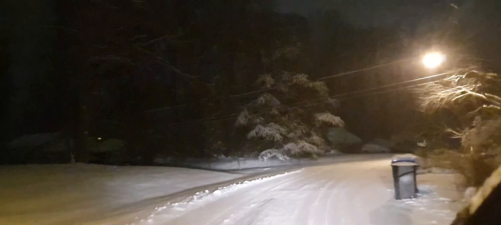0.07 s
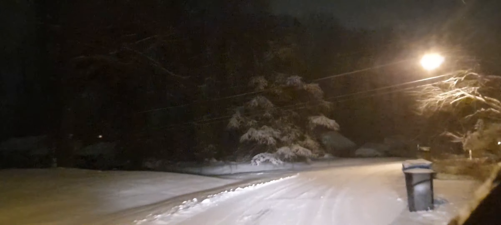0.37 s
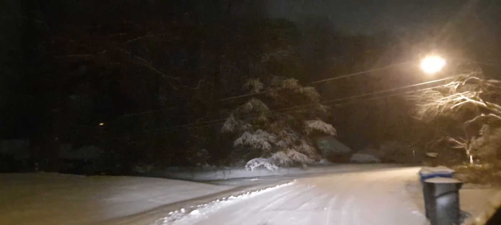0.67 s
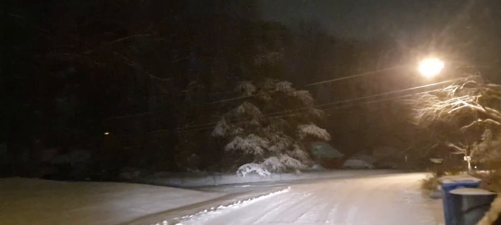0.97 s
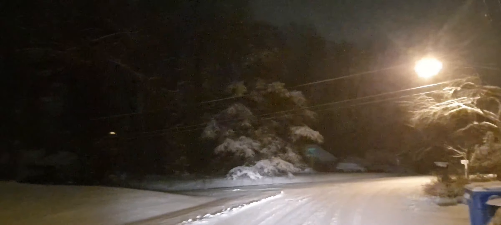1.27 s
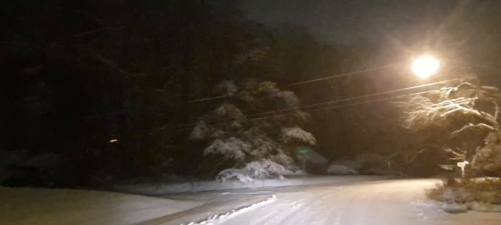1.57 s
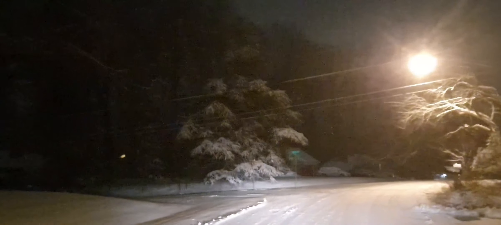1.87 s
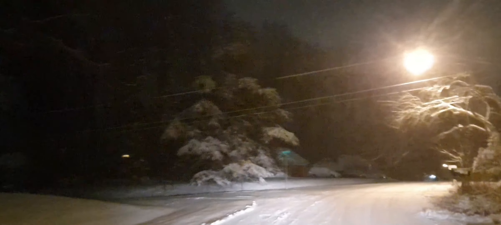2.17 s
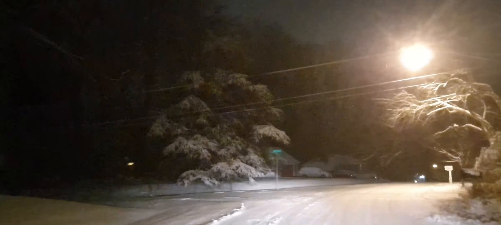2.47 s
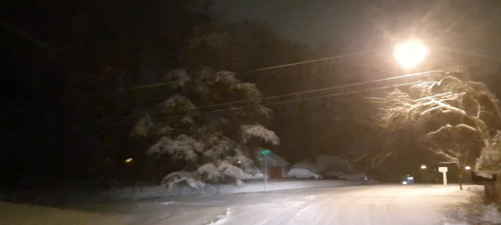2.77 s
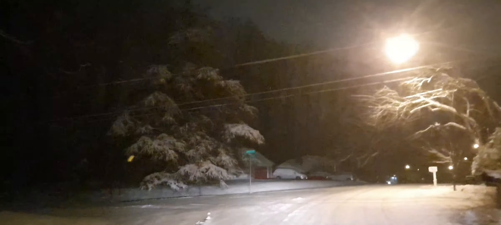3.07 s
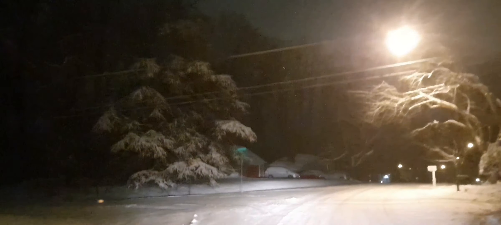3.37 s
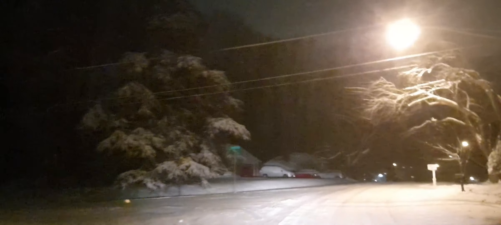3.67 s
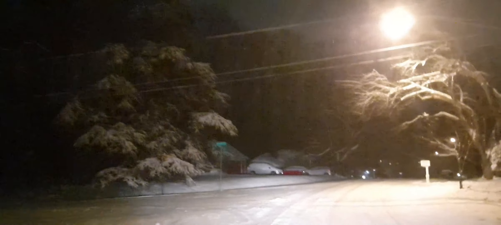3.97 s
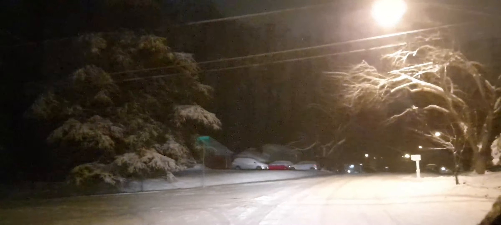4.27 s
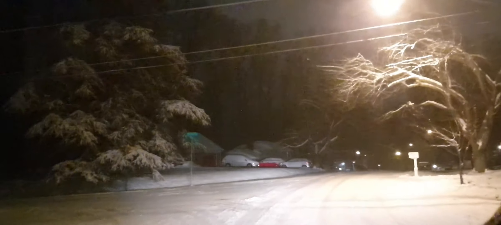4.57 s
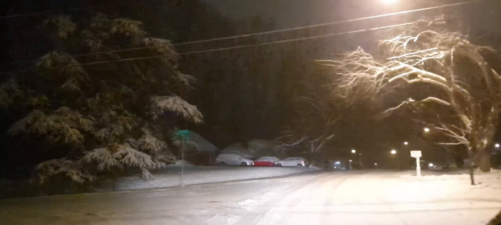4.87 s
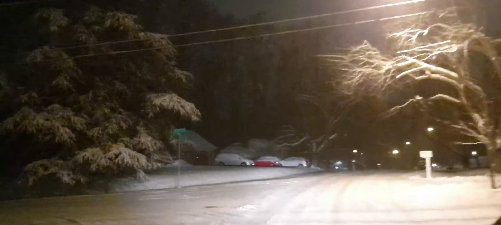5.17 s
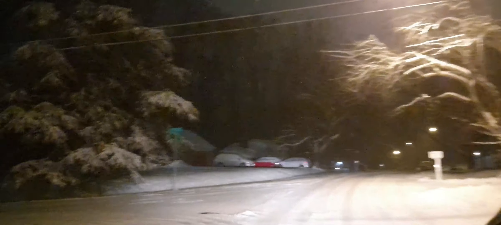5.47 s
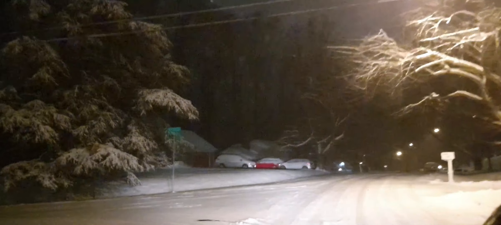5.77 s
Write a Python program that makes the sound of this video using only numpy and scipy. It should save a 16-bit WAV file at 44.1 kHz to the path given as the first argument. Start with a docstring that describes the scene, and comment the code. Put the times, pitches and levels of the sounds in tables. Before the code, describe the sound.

Heard from the cabin, a low engine hum and an uneven rumble accompany a car rolling slowly along a snowy street. Snow crunches and crackles under the tyres throughout, with brittle cracks toward the right and dull bumps toward the left. Tiny squeaks and a soft hiss sit behind the crunching. The engine soon drops back, and the rumble eases near the end.

```python
"""Packed snow fractures under the tyres of a car creeping along a street at night, heard from inside. Each
break is an impulse that excites a resonance: slabs crunch, brittle crust cracks, and grains merge into a dense
crackle. Grains that slip instead squeak and creak, and loose snow hisses. Beneath the snow, ruts thud through
the rumbling body and the engine hums, easing off and then pulling again."""
import sys
import numpy as np
from scipy import signal
from scipy.fft import rfft, irfft
from scipy.io import wavfile

SR = 44100
rng = np.random.default_rng(int(sys.argv[2]) if len(sys.argv) > 2 else 0)


def unload_wav(signal):
    """Save mono or channel-first audio to the path in sys.argv[1] as 16-bit WAV at rate SR, clipped to [-1, 1]."""
    wavfile.write(
        sys.argv[1],
        SR,
        np.round(np.clip(np.atleast_2d(signal).T, -1, 1) * 32767).astype(np.int16),
    )


N = 265658
TIME = np.arange(N) / SR
CRUNCH_NOTE_HZ = 394

# Levels in the tables are relative; each source adds its own trim.
# Body rumble. Each row: time in seconds, level in dB.
RUMBLE_LEVELS = [(0, -39.5), (1.2, -37), (2.0, -36), (2.4, -39.5), (2.85, -35.5), (3.25, -41), (3.65, -41),
                 (3.95, -33), (4.65, -39.5), (5.05, -38.5), (5.45, -41), (5.68, -50), (6.02, -41.5)]
# Engine running. Each row: time in seconds, firing rate in Hz, level in dB, throttle from 0 to 1.
ENGINE_STATES = [(0, 32.15, -39, 0.8), (.5, 31.07, -36.5, 0.88), (1.3, 30.33, -38, 0.98),
                 (1.6, 29.26, -44.5, .1), (2.1, 28.66, -45, 0.1), (2.7, 30.5, -49, 0.1),
                 (3.4, 30.15, -57, 0.6), (5.2, 31.6, -68, 0), (6, 32.2, -51, 0.9)]
# Engine hum. Each row: multiple of the firing rate, level at idle in dB, level at full throttle in dB.
ENGINE_HARMONICS = [(2, -7, -16), (3, 1, -7), (4, -8.5, -2.5)]
# Ruts and lumps. Each row: time near the middle in seconds, length in seconds, left and right level in dB.
RUT_JOLTS = [(.104, 0.027, -28, -42), (.217, .026, -29.5, -52), (.318, 0.027, -37, -37),
             (0.409, 0.025, -33, -44), (0.475, 0.023, -39, -61), (.899, 0.025, -30.5, -58),
             (1.184, .035, -27, -49), (1.25, 0.038, -26.5, -63), (1.359, 0.024, -37, -68),
             (1.504, .026, -25.5, -46), (1.779, .026, -34, -59), (1.908, 0.025, -33, -53),
             (1.979, .05, -36, -50), (2.261, .022, -25, -34), (2.618, 0.027, -29.5, -66),
             (2.707, .026, -29.5, -61), (2.972, 0.024, -31.5, -63), (3.04, 0.035, -32.5, -62),
             (3.366, .08, -33, -56), (3.877, 0.033, -26, -47), (3.95, 0.062, -28.5, -64),
             (4.045, 0.028, -30, -68), (4.248, .026, -36, -62), (4.354, 0.031, -28.5, -51),
             (4.503, .026, -24, -58), (4.91, 0.036, -32, -62), (5.43, .04, -31, -63)]
# Loose snow. Each row: time in seconds, level in dB, fine powder over coarse spray in dB.
SPRAY_LEVELS = [(0, -54.5, -0.1), (1.4, -55, -1), (2.4, -55.5, -0.6), (3.0, -57, -0.5), (3.4, -56.5, 1.5),
                (3.85, -55.5, 2), (4.35, -57, 0), (4.7, -56, .5), (5.05, -54.5, 0.8), (5.5, -57, -1.5),
                (6.02, -57.5, -0.5)]
# Swells of the hiss. Each row: middle in seconds, width in seconds, rise in dB.
SPRAY_SWISHES = [(1.72, 0.12, 2.5), (3.36, 0.18, 3), (3.957, 0.16, 2.5), (4.761, 0.16, 3.5)]
# Cold grains rubbing. Each row: middle in seconds, half-height width in seconds, pitch in Hz, level in dB.
GRAIN_SQUEAKS = [(0.151, 0.02, 2620, -48), (0.42, 0.018, 2650, -46), (1.525, 0.018, 3400, -57),
                 (1.691, 0.075, 4330, -60), (2.307, .03, 3800, -54), (3.184, .03, 4000, -59),
                 (3.317, 0.067, 3960, -56), (3.38, 0.027, 2600, -53), (3.821, 0.018, 2760, -50.5),
                 (3.954, 0.018, 2950, -50.5), (4.552, 0.034, 3500, -58), (5.135, 0.026, 3500, -56),
                 (5.756, 0.036, 1250, -46.5)]
# Crackle, following the firmness of the snow. Each row: time in seconds, level in dB.
CRACKLE_LEVELS = [(0, -44), (1.0, -44), (1.25, -43), (1.7, -42.5), (2.2, -43.5), (2.8, -42.5), (2.95, -45),
                  (3.55, -45), (3.95, -41.5), (4.35, -46.5), (5.05, -45.5), (5.3, -47), (5.6, -44.5),
                  (6.02, -48.5)]
# Crust snapping at the near, right wheel. Each row: start in seconds, level in dB.
CRUST_SNAPS = [(0.154, -36.5), (0.559, -38), (.894, -33), (1.182, -35), (1.199, -33), (1.33, -40),
               (1.39, -37.5), (1.424, -33), (1.474, -48), (1.512, -37), (1.528, -29.5), (1.611, -35),
               (1.671, -34.5), (1.871, -35.5), (2.277, -34), (2.294, -31), (2.31, -29), (2.389, -38.5),
               (2.462, -39), (2.563, -33), (2.584, -36), (2.647, -34.5), (2.66, -35), (2.805, -34),
               (2.842, -37), (3.625, -33.5), (3.796, -34), (3.961, -35), (3.999, -48), (4.164, -38),
               (4.545, -32.5), (5.105, -37), (5.305, -37.5), (5.738, -29), (5.748, -33), (5.768, -29.5),
               (5.974, -43)]
# Slabs collapsing. Each row: start in seconds, nominal length in seconds, left and right level in dB.
SLAB_COLLAPSES = [(0.092, 0.018, -30.5, -35.5), (0.159, 0.02, -36.5, -40), (.202, .013, -33.5, -37),
                  (0.41, 0.013, -33.5, -44), (0.467, .013, -34.5, -36), (0.554, 0.01, -35, -39.5),
                  (0.742, 0.031, -37, -40.5), (.87, 0.0072, -37, -35.5), (0.911, .014, -47, -41),
                  (0.984, 0.023, -41.5, -48), (1.082, 0.014, -32.5, -32.5), (1.167, 0.023, -30, -34.5),
                  (1.232, 0.025, -34.5, -35.5), (1.323, .017, -58, -38), (1.382, .028, -49, -38.5),
                  (1.467, 0.012, -32, -41), (1.498, 0.014, -35, -30.5), (1.761, .02, -35.5, -35.5),
                  (1.815, 0.014, -29.5, -31), (1.866, 0.012, -30, -34), (1.894, .013, -27.5, -44),
                  (1.926, .012, -35, -36.5), (2.046, 0.0094, -31, -54), (2.129, .028, -45, -39.5),
                  (2.253, 0.015, -34.5, -32.5), (2.3, 0.012, -41, -38.5), (2.513, 0.018, -33.5, -32),
                  (2.641, 0.017, -37.5, -32), (2.701, .023, -33.5, -33.5), (2.778, 0.02, -29, -31),
                  (2.855, 0.01, -50, -37), (2.956, 0.0093, -37, -43), (3.02, .014, -28.5, -32.5),
                  (3.074, .02, -46, -40), (3.179, 0.02, -40, -42.5), (3.58, 0.018, -34.5, -39),
                  (3.616, .013, -36, -34), (3.651, 0.0078, -31.5, -43), (3.713, 0.025, -43, -40),
                  (3.762, .014, -36.5, -34), (3.795, .022, -40, -37.5), (3.858, 0.025, -30, -33.5),
                  (3.89, 0.025, -32, -33), (3.93, 0.031, -44, -36), (4.119, 0.014, -44, -37),
                  (4.24, .019, -33.5, -32.5), (4.344, 0.016, -37.5, -38), (4.501, 0.019, -37.5, -40),
                  (4.565, 0.015, -35.5, -44), (4.814, 0.012, -33.5, -44), (4.885, 0.025, -42, -38),
                  (4.927, 0.014, -38.5, -36.5), (5.003, 0.018, -31.5, -35), (5.081, 0.013, -36.5, -36.5),
                  (5.163, .012, -40.5, -39.5), (5.345, .022, -37, -46), (5.433, 0.029, -43, -40),
                  (5.628, 0.016, -51, -43), (5.708, .017, -43, -54), (5.745, .027, -44, -39.5),
                  (5.784, 0.023, -44, -42.5), (5.905, 0.011, -37, -42)]
# Frequency responses, one to a source. Each row: frequency in Hz, left and right gain in dB.
RUMBLE_SPECTRUM = [(15, -27.5, -29), (38, -14, -44), (60, -2, -41), (85, 4, -55), (126, -2.5, -28),
                   (170, -9.5, -29), (257, -16, -59), (477, -30, -32), (940, -30, -60), (2000, -79, -79)]
THUD_SPECTRUM = [(12, -15, -7), (33, -18, -1), (54.7, -3.5, -1), (80.5, 4.5, 1), (117, -2.5, 15),
                 (187, -11.5, 6), (300, -21.5, -27), (770, -43, -57), (2500, -71, -91)]
HISS_SPECTRUM = [(400, -12, -48), (1480, -4.5, 8), (3070, -3, -3), (4640, 0, 0.5), (5500, -2, -2.5),
                 (7600, -2, -3), (9140, -4, -7), (10100, -9, -7.5), (11900, -6, -6.5), (15500, -10, -11.5)]
CRACKLE_SPECTRUM = [(97, -12.5, -28.5), (249, -20.5, -18), (312.4, -1.5, 0), (484, -16.5, -2),
                    (700, -13, -10), (962, -14.5, -12), (1136, -3, -4), (1500, -5.5, -12),
                    (2300, -18.5, -24), (3230, -23.5, -29), (8300, -57.5, -45)]
CRACK_SPECTRUM = [(150, -36, -17), (400, -29, -4), (970, -2, -3), (1195, 2, 3.5), (1640, -5, -4.5),
                  (2240, -7, -9.5), (3860, -18, -25.5), (12000, -35, -40)]
CRUNCH_SPECTRUM = [(50, -16, -21), (140, 1, -22.5), (264, 1.5, -6.5), (333, 0.5, 2.5), (510, -5, -1.5),
                   (638, -10, -5), (970, -18, -10), (1220, -21, -6), (2150, -37, -31), (4000, -42, -37),
                   (12000, -60, -68)]


def gain_of(db):
    """Amplitude grows tenfold for every 20 dB."""
    return 10 ** (np.asarray(db) / 20)


def unit_rms(x):
    """Normalisation to a mean power of one."""
    return x / np.sqrt(np.mean(x ** 2) + 1e-20)


def curves(table):
    """Linear interpolation of each column over time."""
    s, *columns = np.transpose(table)
    return [np.interp(TIME, s, column) for column in columns]


def swell(s, width):
    """A Gaussian envelope of height one, centred on time s."""
    return np.exp(-(2 * (TIME - s) / width) ** 2)


def add(mix, s, sound):
    """Superposition: a stereo sound joins the mix at time s."""
    part = mix[:, max(0, round(s * SR)):][:, :sound.shape[1]]
    part += sound[:, :part.shape[1]]


def wander(rate_hz):
    """Low-passed noise of rms one, for slow random modulation."""
    hz = np.fft.rfftfreq(N, 1 / SR)
    return unit_rms(irfft(rfft(rng.standard_normal(N)) / (1 + (hz / rate_hz) ** 4), N))


def impulses(per_s, spread_db, size):
    """A Poisson train of breaks or slips: most are small, a few large."""
    strength = gain_of(spread_db * np.minimum(rng.exponential(1, size), 4))
    return strength * rng.choice([-1, 1], size) * (rng.random(size) < per_s / SR)


def resonance(x, hz, quality):
    """A resonator of peak gain one; its bandwidth is its frequency over its quality."""
    return signal.lfilter(*signal.iirpeak(hz, quality, fs=SR), x)


def impulse_response(spectrum, size=8192):
    """Minimum phase: the Hilbert transform of the log gain gives each side a causal response."""
    hz, *sides_db = np.transpose(spectrum)
    log_bin_hz = np.log(abs(np.fft.fftfreq(size, 1 / SR)) + 1)
    log_gain = np.log(gain_of([np.interp(log_bin_hz, np.log(hz), side) for side in sides_db]))
    transfer = np.exp(np.conj(signal.hilbert(log_gain)))
    return np.fft.ifft(transfer).real[:, :size // 2]


def coloured(x, spectrum):
    """Convolution imposes a spectrum on a whole track; the result has rms one."""
    return unit_rms(signal.oaconvolve(x, impulse_response(spectrum), axes=1)[:, :N])


def strike(force, body, sides_db, length):
    """Forced response of a body; each side carries the energy of its level held for the length."""
    sound = signal.fftconvolve(force, body, axes=1)
    sound /= np.linalg.norm(sound, axis=1, keepdims=True) + 1e-12
    return sound * np.sqrt(length * SR) * gain_of(sides_db)[:, None]


def rumble(level_db, trim_db=-3, lumpy_db=2):
    """Random forcing makes the body drone unevenly on its springs, mostly on the left."""
    drive = rng.standard_normal((2, N)) * gain_of(lumpy_db * wander(21))
    return gain_of(level_db + trim_db) * coloured(drive, RUMBLE_SPECTRUM)


def engine(right_db=-25, waver=0.0078):
    """Periodic firing gives low harmonics that boom in the cabin; throttle brings out the fourth."""
    firing_hz, level_db, throttle = curves(ENGINE_STATES)
    cycles = np.cumsum(firing_hz * (1 + waver * wander(3.1))) / SR
    hum = np.zeros(N)
    for multiple, idle_db, driven_db in ENGINE_HARMONICS:
        amplitude = np.sqrt(2) * gain_of(idle_db + throttle * (driven_db - idle_db))
        hum += amplitude * np.sin(2 * np.pi * (multiple * cycles + rng.random()))
    return gain_of(level_db) * hum * gain_of([[0], [right_db]])


def thuds(lead_share=0.62, trim_db=-1):
    """Shock excitation: each rut gives a short rough shove that the body answers with a deep boom."""
    out, body = np.zeros((2, N)), impulse_response(THUD_SPECTRUM)
    for s, length, *sides_db in RUT_JOLTS:
        shove = signal.windows.hann(int(length * SR))
        force = shove * rng.standard_normal((2, len(shove)))
        add(out, s - lead_share * length, strike(force, body, np.add(sides_db, trim_db), length))
    return out


def hiss(trim_db=1.27, shared=0.45, split_hz=7000, coarse_flicker_db=1.48, fine_flicker_db=1.14):
    """Spray off the wheels sums to noise: coarse grains partly correlated between sides, powder not."""
    level_db, powder_db = curves(SPRAY_LEVELS)
    swish_db = sum(rise_db * swell(s, width) for s, width, rise_db in SPRAY_SWISHES)
    coarse = unit_rms(rng.standard_normal((2, N)) + shared * rng.standard_normal(N))
    coarse *= gain_of(coarse_flicker_db * wander(18))
    fine = unit_rms(impulses(per_s=11000, spread_db=3.5, size=(2, N)))
    fine *= gain_of(fine_flicker_db * np.array([wander(23), wander(22)]))
    fine *= gain_of(powder_db + 0.64 * wander(5))  # powder comes in puffs
    low_pass = signal.butter(2, split_hz, "low", fs=SR)
    high_pass = signal.butter(2, split_hz, "high", fs=SR)
    spray = signal.lfilter(*low_pass, coarse) + signal.lfilter(*high_pass, fine)
    return gain_of(level_db + swish_db + trim_db) * coloured(spray, HISS_SPECTRUM)


def whistle(level_db=-54):
    """A narrow resonance picks a thin tone out of noise during the strongest swish."""
    tone = unit_rms(resonance(rng.standard_normal((2, N)), hz=5990, quality=18))
    return gain_of(level_db) * swell(s=4.77, width=0.12) * tone


def creaks(level_db, notes_hz, per_s, spread_db, quality, db_per_octave):
    """Stick-slip of single grains: each slip rings one of a set of notes, the higher ones fainter."""
    out = np.zeros((2, N))
    for hz in notes_hz:
        slips = impulses(per_s, spread_db, size=(2, N))
        out += gain_of(db_per_octave * np.log2(hz / notes_hz[0])) * resonance(slips, hz, quality)
    return gain_of(level_db) * unit_rms(out)


def squeaks(quality=3.7):
    """Stick-slip in quick runs: many slips between grains ring in one narrow band."""
    out = np.zeros((2, N))
    for s, width, hz, db in GRAIN_SQUEAKS:
        press = signal.windows.hann(int(2 * width * SR))
        slips = impulses(per_s=5000, spread_db=4.4, size=(2, len(press)))
        squeak = unit_rms(resonance(resonance(slips, hz, quality), hz, quality))
        add(out, s - width, gain_of(db) * press * squeak)
    return out


def crackle(level_db, trim_db=-1.5, left_db=-2, far_clump_db=4, near_clump_db=5, crosstalk=0.29):
    """Impulse density sets texture: grains crushed by the far wheels blur, those at the near one tick."""
    far = unit_rms(impulses(per_s=5000, spread_db=2.3, size=N) * gain_of(far_clump_db * wander(23)))
    near = impulses(per_s=1400, spread_db=2.7, size=N)
    # A clump can bear only so much load, which caps its loudness.
    near = unit_rms(near * gain_of(near_clump_db * np.minimum(wander(31), 1)))
    sides = np.array([gain_of(left_db) * (far + crosstalk * near), near])
    return gain_of(level_db + trim_db) * coloured(sides, CRACKLE_SPECTRUM)


def crumbs(level_db, left_db=-9, right_db=-7, clump_db=7):
    """Small clods fail in random clusters and excite the same damped resonance as the slabs."""
    breaks = impulses(per_s=500, spread_db=2, size=(2, N))
    breaks *= gain_of(clump_db * np.minimum(wander(16), 1))
    muffled = coloured(resonance(breaks, CRUNCH_NOTE_HZ, quality=0.8), CRUNCH_SPECTRUM)
    return gain_of(level_db) * gain_of([[left_db], [right_db]]) * muffled


def cracks(length_s=0.0035, left_db=-12, right_db=1.5, splinter=0.22, decay_s=0.0074, direct=0.64):
    """Brittle fracture: one snap and a few splinters ring a plate of crust at its own frequency."""
    out, body = np.zeros((2, N)), impulse_response(CRACK_SPECTRUM)
    t = np.arange(SR // 60) / SR
    for s, db in CRUST_SNAPS:
        breaks = splinter * impulses(per_s=2400, spread_db=1.4, size=(2, len(t))) * np.exp(-t / decay_s)
        breaks[:, 0] += 1  # the snap itself
        force = direct * breaks + resonance(breaks, hz=rng.uniform(800, 1650), quality=2)
        add(out, s + 0.001033, strike(force, body, [db + left_db, db + right_db], length_s))
    return out


def crunches(stretch=1.32, debris_share=0.27, debris_decay_s=0.023, main_share=0.58, main_at_s=0.00494,
             lean_db=14.5, direct=0.35, trim_db=0.06):
    """Avalanche fracture: a slab fails in one main break amid many small ones, then debris trails off."""
    out, body = np.zeros((2, N)), impulse_response(CRUNCH_SPECTRUM)
    t = np.arange(SR // 10) / SR
    for s, length, left_db, right_db in SLAB_COLLAPSES:
        # The note lies up to an octave lower for a slab on the left, higher for one on the right.
        note_hz = CRUNCH_NOTE_HZ * 2 ** np.tanh((right_db - left_db) / lean_db)
        collapse = signal.windows.tukey(int(stretch * length * SR), 0.5)
        debris = debris_share * (t > length) * np.exp(-(t - length) / debris_decay_s)
        load = np.maximum(np.pad(collapse, (0, len(t) - len(collapse))), debris)
        breaks = load * impulses(per_s=1900, spread_db=4, size=(2, len(t)))
        main_break = main_share * np.linalg.norm(breaks, axis=1) * rng.choice([-1, 1], size=2)
        breaks[:, int(main_at_s * SR)] += main_break
        force = direct * breaks + resonance(breaks, note_hz, quality=0.99)
        add(out, s - 0.00096, strike(force, body, [left_db + trim_db, right_db + trim_db], length))
    return out


def scene():
    """Superposition of the car's low sounds and the snow breaking and rubbing under its tyres."""
    (rumble_db,), (snow_db,) = curves(RUMBLE_LEVELS), curves(CRACKLE_LEVELS)
    car = rumble(rumble_db) + engine() + thuds()
    breaking = crunches() + crumbs(snow_db) + cracks() + crackle(snow_db)
    high_creaks = creaks(snow_db - 19, notes_hz=np.geomspace(2299, 5397, 24),
                         per_s=7, spread_db=3, quality=84, db_per_octave=-4)
    squeaking = squeaks()
    low_creaks = creaks(snow_db - 14, notes_hz=np.geomspace(1100, 3300, 16),
                        per_s=14, spread_db=4, quality=16, db_per_octave=-8)
    return car + breaking + high_creaks + squeaking + low_creaks + hiss() + whistle()


def record(dry, cutoff_hz=15780):
    """Band limiting: a linear-phase low-pass filter removes the highest treble."""
    low_pass = signal.firwin(1023, cutoff_hz, window=("kaiser", 9), fs=SR)
    return signal.oaconvolve(dry, low_pass[None], "same", axes=1)


dry = scene()
out = record(dry)
unload_wav(out)
```